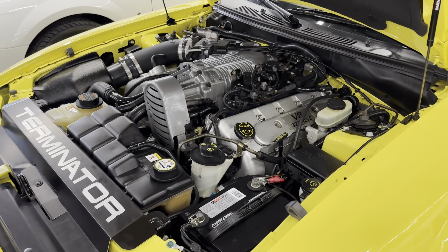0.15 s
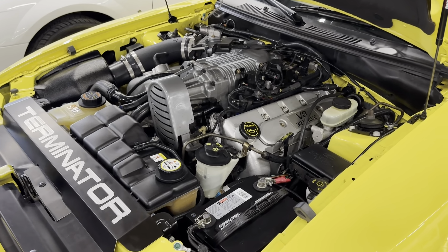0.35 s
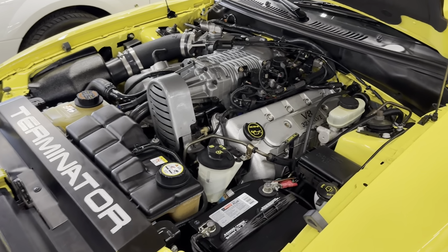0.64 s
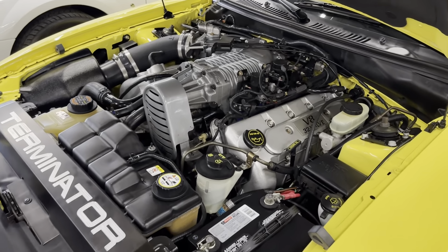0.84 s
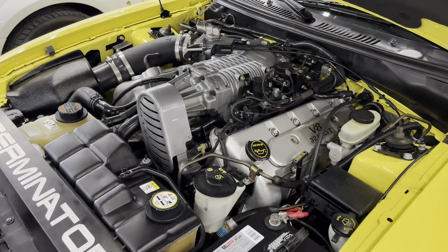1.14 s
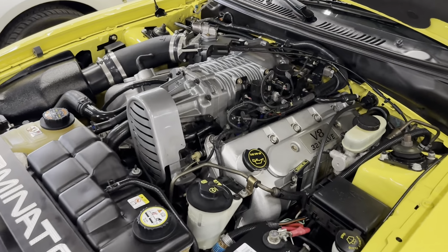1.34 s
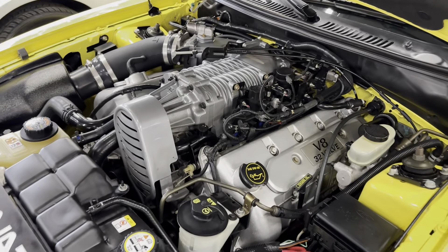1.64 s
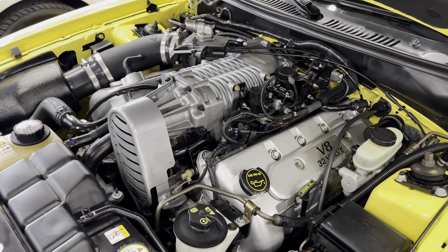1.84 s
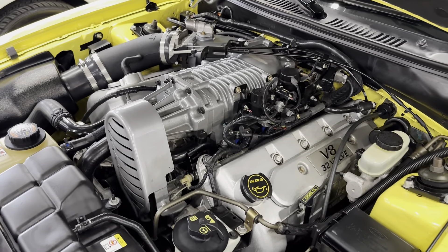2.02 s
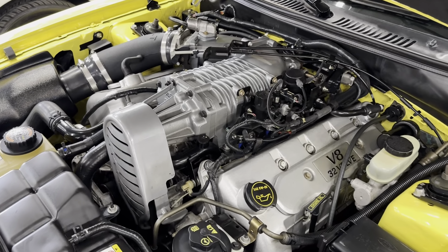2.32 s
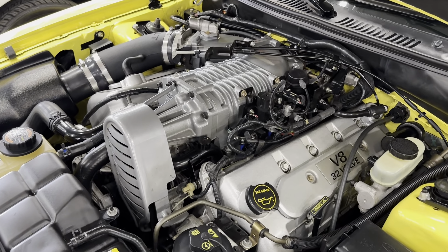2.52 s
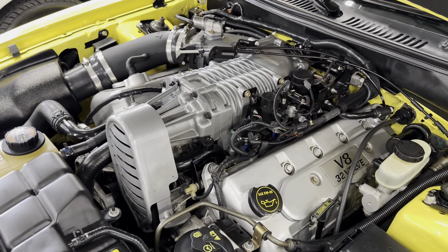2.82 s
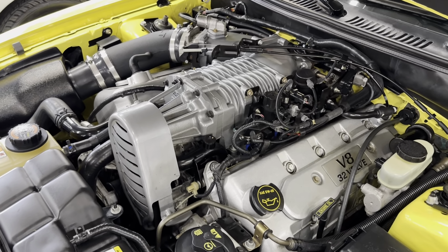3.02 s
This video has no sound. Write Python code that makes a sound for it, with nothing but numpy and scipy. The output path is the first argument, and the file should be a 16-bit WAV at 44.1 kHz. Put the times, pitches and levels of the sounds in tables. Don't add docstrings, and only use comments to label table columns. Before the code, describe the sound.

Car engine revs down with a deep burbling hum, settling into idle with faint ticking

```python
import sys
import numpy as np
from scipy import signal
from scipy.fft import rfft, irfft, next_fast_len
from scipy.io import wavfile

SR = 44100
rng = np.random.default_rng(int(sys.argv[2]) if len(sys.argv) > 2 else 0)


def to_wav(sig):
    pcm = np.clip(np.atleast_2d(sig), -1, 1) * 32767
    pcm = np.round(pcm).astype(np.int16)
    wavfile.write(sys.argv[1], SR, pcm.T)


def voltage_ratio(decibels):
    exponent = np.asarray(decibels, float) / 20
    return 10 ** exponent


N = 139797


def rms_one(x):
    return x / np.sqrt(np.mean(x ** 2))


def in_time(rows):
    start_s, *columns = np.transpose(rows)
    return [np.interp(np.arange(N) / SR, start_s, column) for column in columns]


def at_hz(points, hz):
    table_hz, values = np.array(points)[:, 0], np.array(points)[:, 1]
    return np.interp(np.log(hz + 1), np.log(table_hz), values)


def drift(rate_hz):
    step = 40
    pole = np.exp(-2 * np.pi * step * rate_hz / SR)
    noise = rng.standard_normal(N // step + 2002)
    slow = signal.lfilter([1], [1, -2 * pole, pole * pole], noise)[2000:]
    return np.interp(np.arange(N) / step, np.arange(len(slow)), rms_one(slow - slow.mean()))


def shaped(x, response):
    size = next_fast_len(N + SR // 4)
    hz = np.arange(size // 2 + 1) * SR / size
    return irfft(rfft(x, size) * response(hz), size)[..., :N]


# pitch_hz [Hz], width_hz [Hz], level_db [dB], polarity [+1 or -1]
PIPE_MODES = [(40.4, 3.5, -4.5, -1), (66.5, 6.7, -14.5, 1), (96.6, 9.4, 0, -1), (123.8, 15.8, 0.5, 1),
              (139, 86, -15, -1), (186.7, 10.7, -3, 1), (211.8, 23.2, -6, -1), (228.7, 26.4, -7.5, 1),
              (304, 10.8, -13, -1)]


def pipe(hz):
    hz = hz + 1
    total = 0
    for pitch_hz, width_hz, level_db, polarity in PIPE_MODES:
        detuning = (hz / pitch_hz - pitch_hz / hz) * pitch_hz / width_hz
        total = total + np.sign(polarity) * voltage_ratio(level_db) / (1 + 1j * detuning)
    return total


# start_s [s], firing_push_db [dB], octave_push_db [dB], bank_imbalance_db [dB], burble_db [dB]
THROTTLE = [
    (0, -17, -5.5, -1.5, -22.5),
    (.15, -17, 5, -5, -23.5),
    (.2, -5, 8, 1, -23.5),
    (.27, 12.5, 6, 3.5, -27),
    (.34, -0.5, 10, -1.5, -21.5),
    (.6, 2, 10, -0.5, -22.5),
    (1.0, 0, 1, 0.5, -28.5),
    (1.5, -2.5, 4, -5.5, -25.5),
    (2.3, 6, 3, -1.5, -28),
    (3.17, -24, 2, 0.5, -31),
]
# order [multiple of the cycle rate], level_db [dB]
EXHAUST_ORDERS = [(5, -31.5), (8, -17), (10, -60), (11, -30.5), (12, -44), (13, -30), (14, -47.5),
                  (15, -47.5), (16, -18.5), (19, -20.5), (21, -16.5), (22, -45), (24, -24), (25, -29.5),
                  (27, -21), (29, -22), (32, -22.5), (35, -36), (37, -34.5), (40, -37)]
BANKS = [1, -1, -1, 1, -1, 1, 1, -1]


def exhaust(rate, turn):
    waver_db, waver_power = 1.0, 3
    firing_db, octave_db, banks_db, _ = in_time(THROTTLE)
    phase = np.angle(np.fft.fft(BANKS))
    phase[[0, 2, 4, 6]] = 0, *rng.uniform(0, 2 * np.pi, 3)
    out = 0
    for order, level_db in EXHAUST_ORDERS:
        order = round(order)
        growth = 1 if order == 8 else (rate / rate.min()) ** waver_power
        level_db = level_db + waver_db * growth * drift(8)
        if order == 8:
            level_db = level_db + firing_db
        if order == 16:
            level_db = level_db + octave_db
        if order % 2:
            level_db = level_db + banks_db
        gain = voltage_ratio(level_db) * pipe(rate * order / 8)
        rotation = np.exp(1j * (2 * np.pi * turn * order / 8 + phase[order % 8]))
        out = out + np.sqrt(2) * np.real(gain * rotation)
    return out


def boom():
    pitch_hz, level_db, end_s, fall_s = 98, -11, .163, .004
    s = np.arange(N) / SR
    tone = np.sqrt(2) * np.sin(2 * np.pi * pitch_hz * s)
    closing = 1 + np.exp(np.minimum((s - end_s) / fall_s, 50))
    return voltage_ratio(level_db + .4 * drift(10)) * tone / closing


def burble(fired):
    low_hz = 170
    pulses = np.zeros((3, N))
    pulses[:, fired] = np.tanh(rng.standard_normal((len(fired), 3))).T
    ringing = shaped(pulses, lambda hz: pipe(hz) * hz ** 2 / (hz ** 2 + low_hz ** 2))
    return voltage_ratio(in_time(THROTTLE)[-1]) * rms_one(ringing)


# start_s [s], moving_parts_db [dB], injectors_db [dB]
BAY = [
    (0.0, -24, -46),
    (0.18, -28, -48),
    (0.21, -28, -50.5),
    (1.39, -31, -40.5),
    (3.16, -29, -37),
    (3.17, -31, -42),
]
# pitch_hz [Hz], level_db [dB per Hz]
RUSH_SPECTRUM = [(40, -12), (250, 2), (345, -4.5), (600, -1), (1000, -4), (1750, -11.5), (5200, -21),
                 (15500, -25.5)]
# pitch_hz [Hz], width_hz [Hz], level_db [dB]
COVERS = [(485, 32.4, 6), (614, 59, 3.5), (740, 29, 1.5), (844, 80, -3.5), (1360, 346, 2), (1546, 51, 0),
          (2464, 360, 1.5), (3130, 240, 3), (3730, 490, -2), (4570, 110, 2.5), (6270, 500, 0.5),
          (7000, 280, 1), (8180, 140, 0)]


def rush():
    level_db, flicker_db, cover_waver_db = 1.5, 0.59, 2
    white, cover_drive = rng.standard_normal((2, 3, N))
    noise = shaped(white, lambda hz: voltage_ratio(at_hz(RUSH_SPECTRUM, hz)))
    for pitch_hz, width_hz, cover_db in COVERS:
        ring = signal.lfilter(*signal.iirpeak(pitch_hz, pitch_hz / width_hz, SR), cover_drive)
        ring_db = at_hz(RUSH_SPECTRUM, pitch_hz) + cover_db - 2 + cover_waver_db * drift(12.6)
        noise += voltage_ratio(ring_db) * ring
    return voltage_ratio(in_time(BAY)[0] + level_db + flicker_db * drift(36)) * rms_one(noise)


def whine(turn):
    ratio = 26.1
    level_db, follows, waver_db, wobble_cycles = -50, 2.0, 2.5, .06
    bay_db = in_time(BAY)[0]
    level = voltage_ratio(level_db + follows * (bay_db - bay_db.mean()) + waver_db * drift(30))
    return level * np.sqrt(2) * np.sin(2 * np.pi * (ratio * turn + wobble_cycles * drift(7.8)))


INJECTORS = [0, -11, -6, -11, -12, -3.5, -9, -1.5]
# pitch_hz [Hz], level_db [dB per Hz]
TICK_SPECTRUM = [(1500, -39), (5000, -10), (8500, -12), (11500, 7.5), (13500, -10), (15500, -4)]


def ticks(fired, cylinder):
    rise_s, fall_s, spread_db = .002, .003, 1.2
    clicks = np.zeros(N)
    clicks[fired] = voltage_ratio(np.array(INJECTORS)[cylinder] + spread_db * rng.standard_normal(len(fired)))
    s = np.arange(SR // 20) / SR
    envelope = (1 - np.exp(-s / rise_s)) * np.exp(-s / fall_s)
    gate = signal.fftconvolve(clicks, envelope)[:N]
    bursts = shaped(gate * rng.standard_normal((3, N)), lambda hz: voltage_ratio(at_hz(TICK_SPECTRUM, hz)))
    return voltage_ratio(in_time(BAY)[1]) * rms_one(bursts)


# pitch_hz [Hz], likeness [0-1]
LIKENESS = [(60, .995), (140, .975), (270, .87), (550, .72), (1200, .4), (4400, .45), (5500, .2),
            (8300, .8), (10600, .985)]
# pitch_hz [Hz], lead_rad [radians]
LEAD = [(300, 0), (1200, -.5), (1550, -3.1), (2240, 0), (7400, -2.2), (8100, .2), (10600, 2.85),
        (11800, 3.45), (13900, 6.2), (15100, 6.4), (16000, 7.5)]
# pitch_hz [Hz], left_minus_right_db [dB]
BALANCE = [(60, -2.2), (110, -0.74), (200, -3.7), (380, -1.8), (700, 2.9), (1290, 2.7), (2380, -0.07),
           (4400, -0.39), (8120, 2.7), (15000, 0.2)]


def pair(common, own):
    def shared_response(hz):
        half_lead = np.exp(-.5j * np.interp(hz, *np.transpose(LEAD)))
        return np.sqrt(at_hz(LIKENESS, hz)) * np.array([half_lead, 1 / half_lead])

    shared = shaped(common, shared_response)
    private = shaped(own, lambda hz: np.sqrt(1 - at_hz(LIKENESS, hz)))
    return shaped(shared + private, lambda hz: voltage_ratio(at_hz(BALANCE, hz) * [[.5], [-.5]]))


# start_s [s], firing_rate_hz [firings per s]
SPEED = [(0.0, 97.0), (0.15, 90.65), (0.3, 84.86), (0.5, 80.05), (0.7, 74.79), (0.9, 69.39), (1.1, 68.2),
         (1.35, 66.26), (1.6, 64.06), (2.0, 63.17), (2.4, 60.92), (2.7, 60.91), (3.17, 60.45)]


def scene():
    rate, = in_time(SPEED)
    turn = .72 + np.cumsum(rate) / SR
    firing_count = np.floor(turn + .06)
    fired = np.flatnonzero(np.diff(firing_count))
    cylinder = firing_count[fired + 1].astype(int) % 8
    tone = exhaust(rate, turn) + boom()
    parts = burble(fired) + rush() + ticks(fired, cylinder)
    blower = whine(turn)
    return pair(parts[0] + tone, parts[1:] + tone * [[1], [-1]]) + blower


def band_limit(x):
    return signal.sosfilt(signal.butter(12, 16100, fs=SR, output="sos"), x)


def record(dry):
    low_cut = signal.butter(2, 43, "high", fs=SR, output="sos")
    top_cut = signal.ellip(12, .5, 70, 15780, fs=SR, output="sos")
    mix = signal.sosfilt(np.vstack([low_cut, top_cut]), dry)
    return band_limit(mix)


dry = scene()
out = record(dry)
to_wav(out)
```